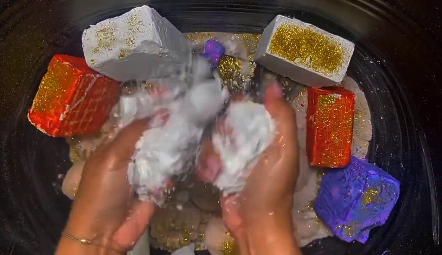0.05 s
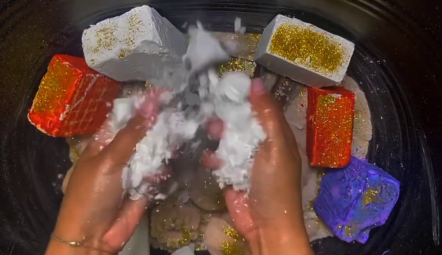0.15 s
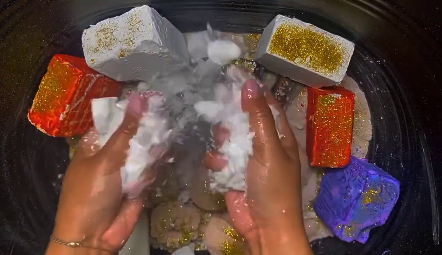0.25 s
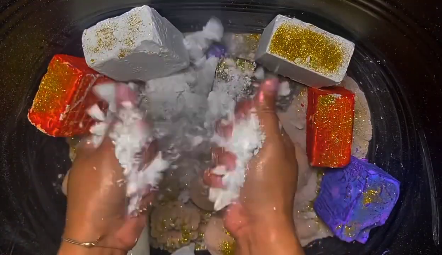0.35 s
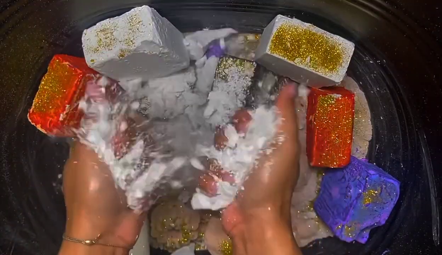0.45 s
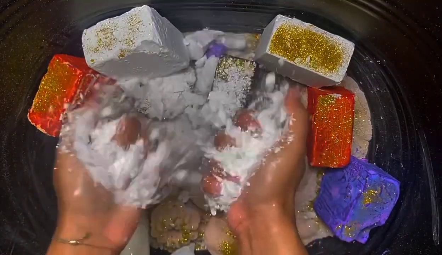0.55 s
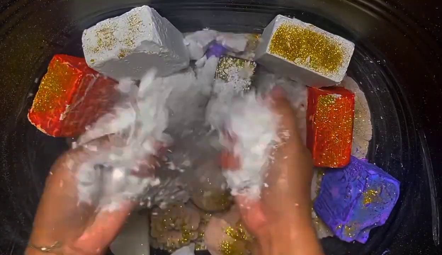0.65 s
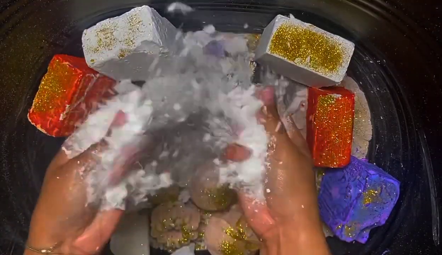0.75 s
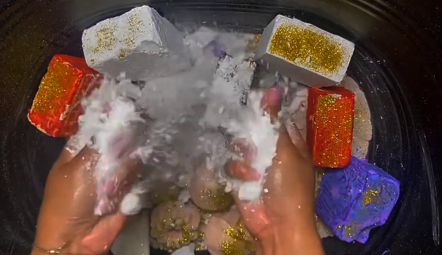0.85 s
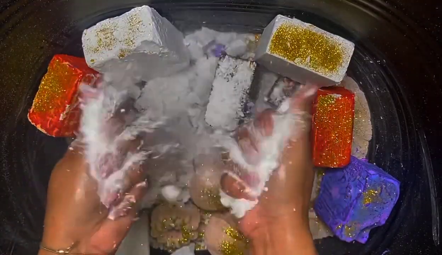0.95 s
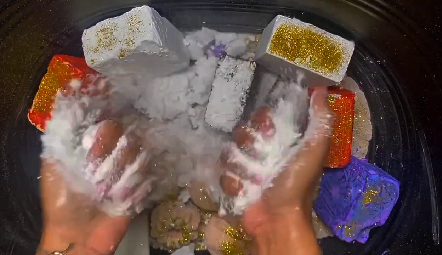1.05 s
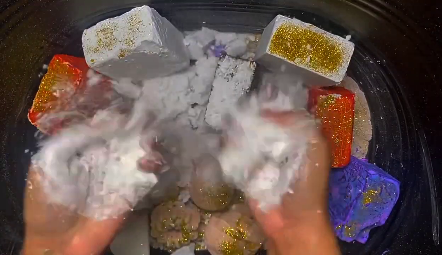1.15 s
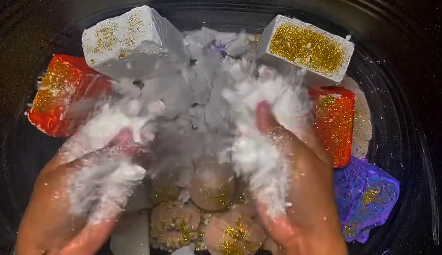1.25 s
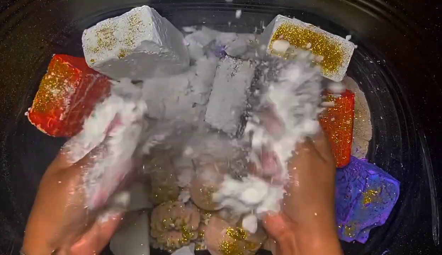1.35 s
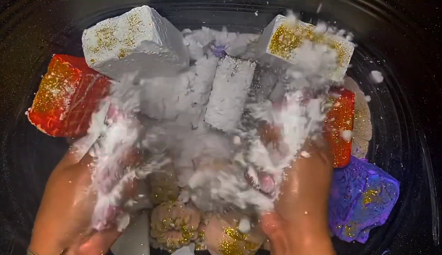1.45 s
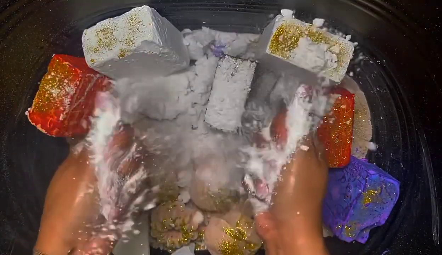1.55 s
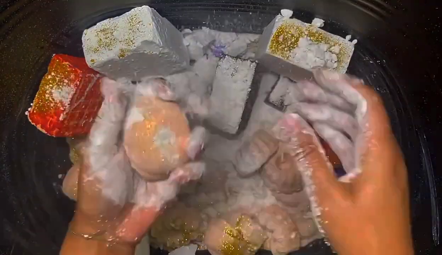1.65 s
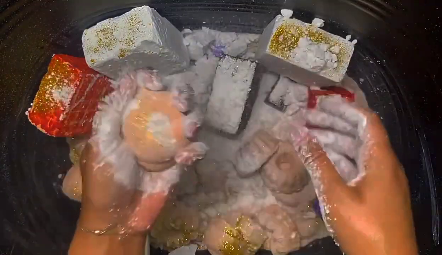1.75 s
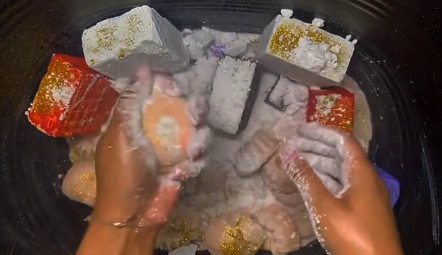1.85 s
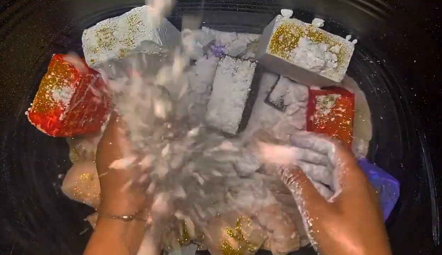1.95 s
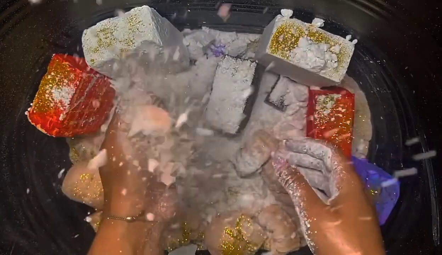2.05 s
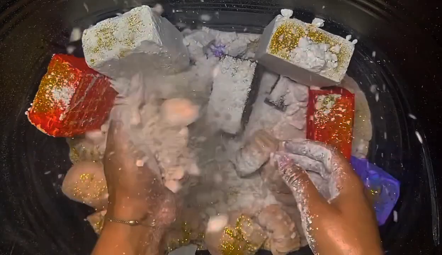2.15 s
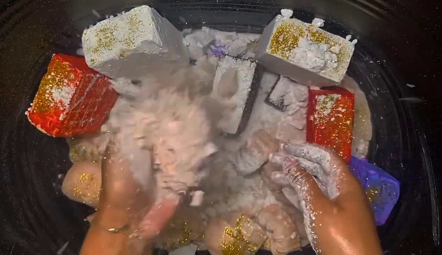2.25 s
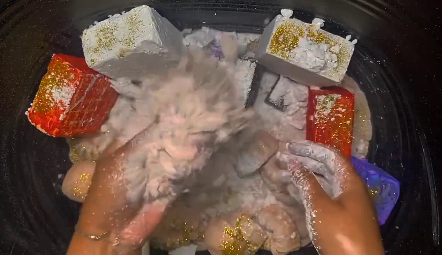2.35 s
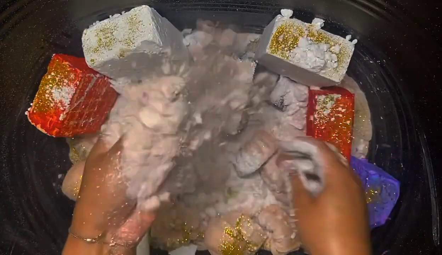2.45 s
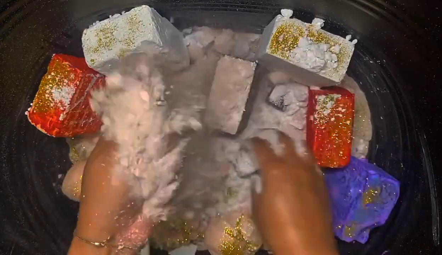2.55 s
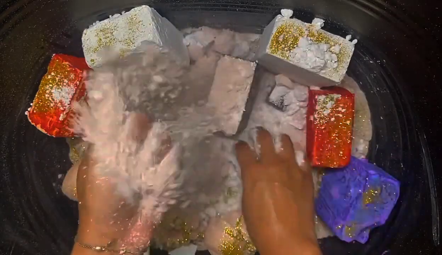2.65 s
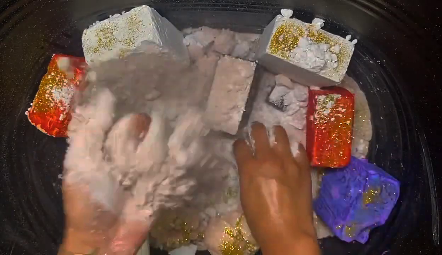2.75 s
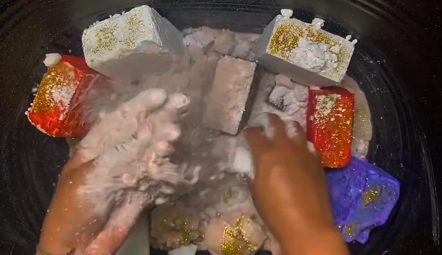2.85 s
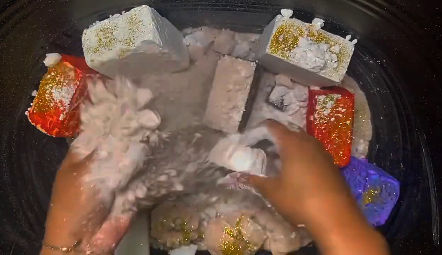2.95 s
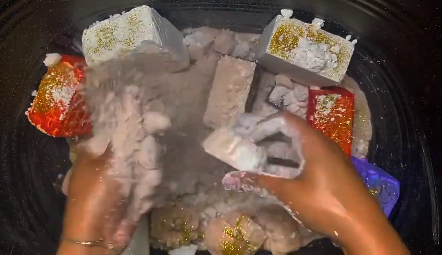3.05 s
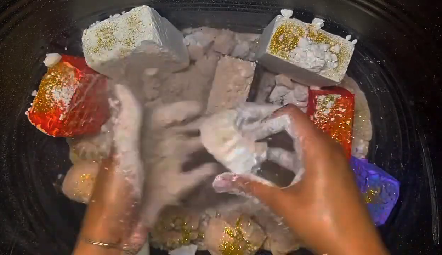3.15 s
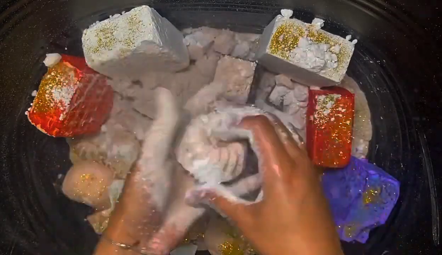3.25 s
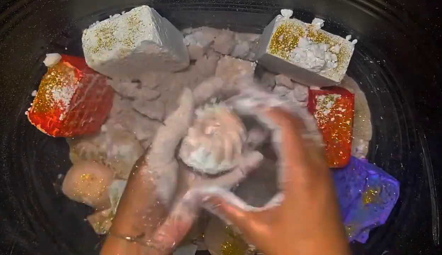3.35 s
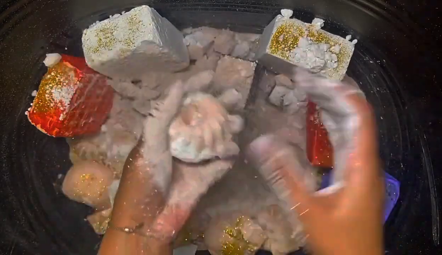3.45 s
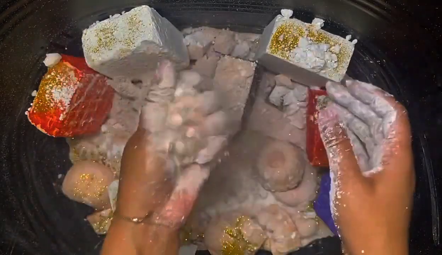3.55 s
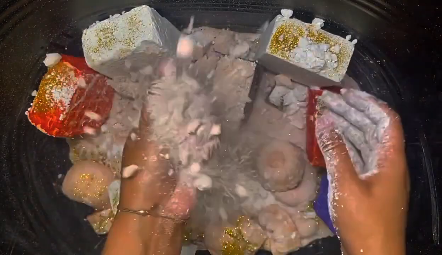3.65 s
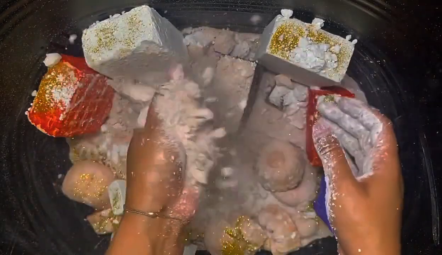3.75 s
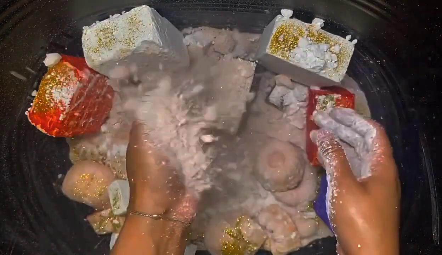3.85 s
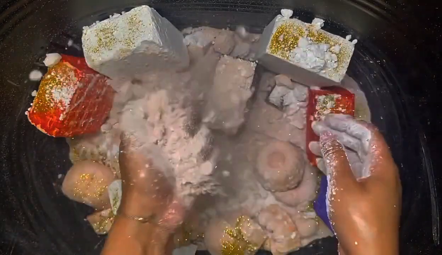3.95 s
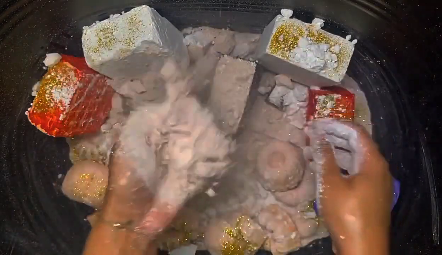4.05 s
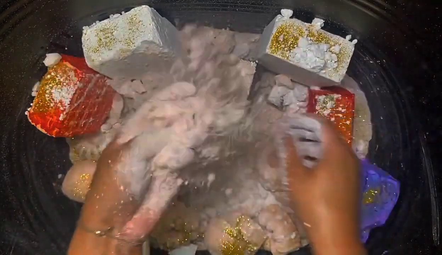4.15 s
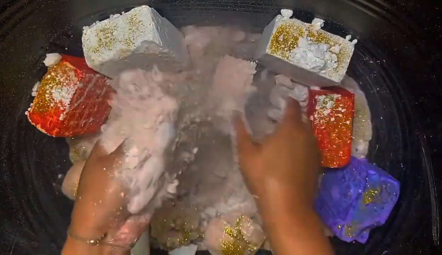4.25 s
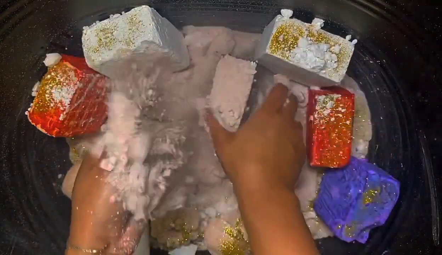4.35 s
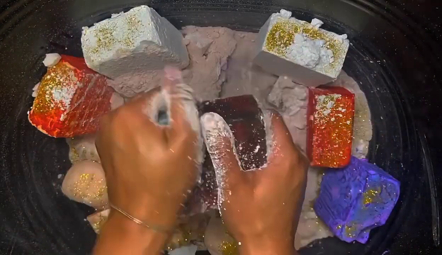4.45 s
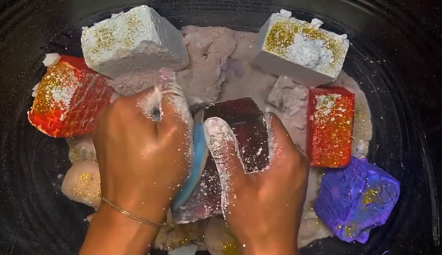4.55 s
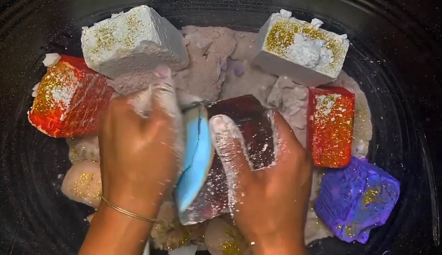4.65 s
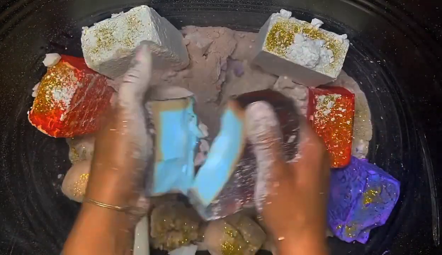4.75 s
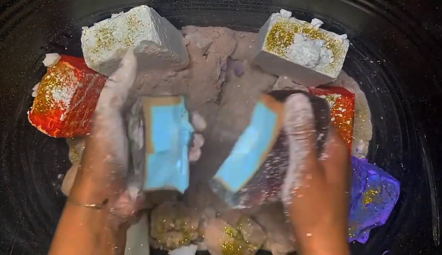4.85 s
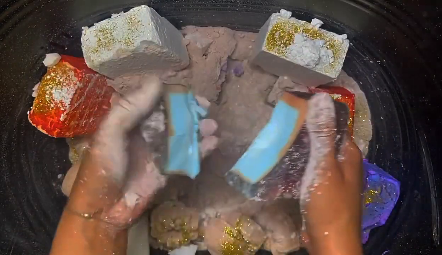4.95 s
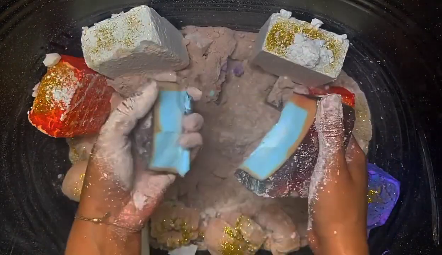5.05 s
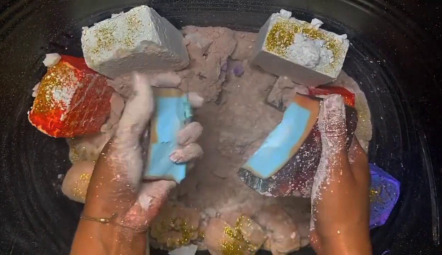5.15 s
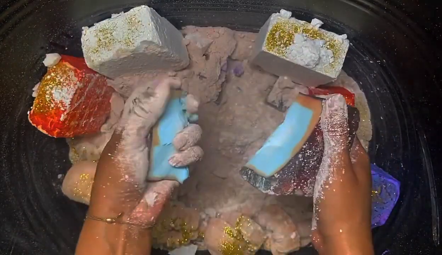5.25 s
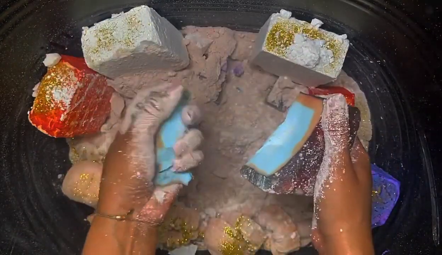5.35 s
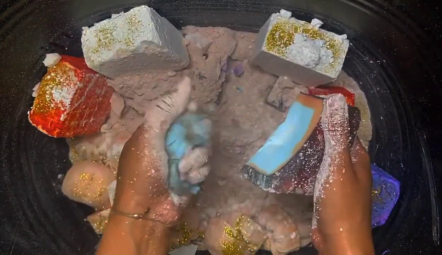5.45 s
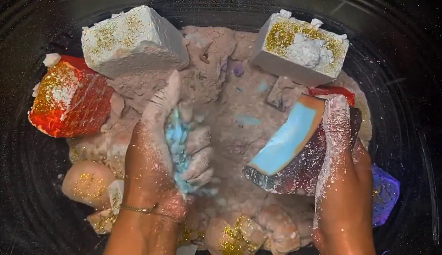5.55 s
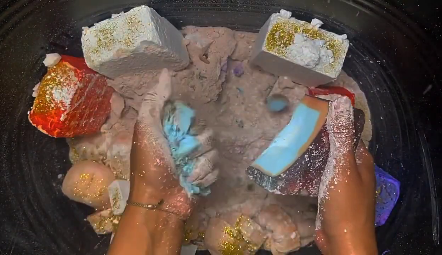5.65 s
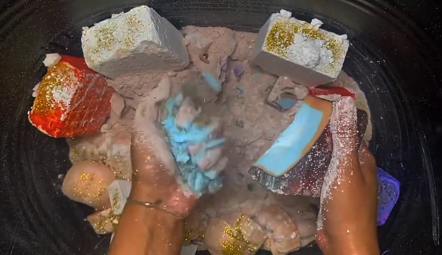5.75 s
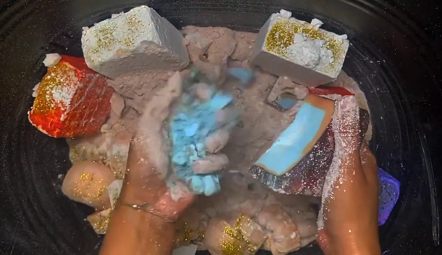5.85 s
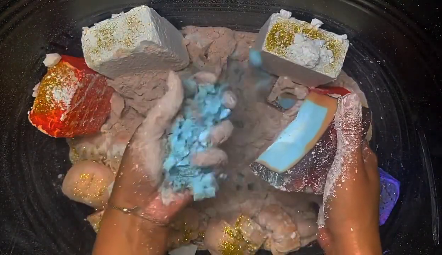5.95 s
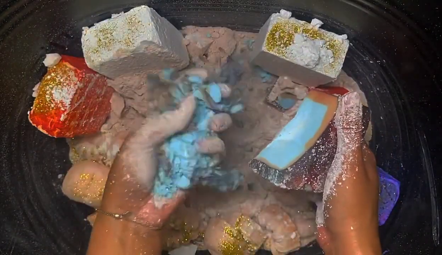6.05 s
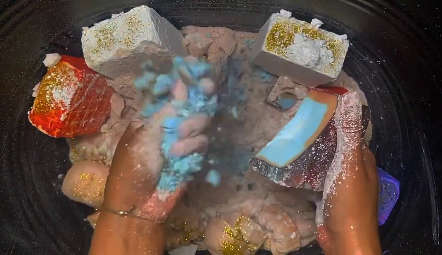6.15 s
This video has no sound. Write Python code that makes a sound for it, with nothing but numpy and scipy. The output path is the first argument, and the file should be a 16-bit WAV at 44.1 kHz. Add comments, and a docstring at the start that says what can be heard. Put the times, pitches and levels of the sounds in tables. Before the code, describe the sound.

Hands crush dry chalk over a plastic tub, close to the microphone in a quiet room. It opens with two loud crunches at about 0.2 and 0.4 seconds: pieces snap with a short, high ring, powder hisses, and lumps thump hollowly on the tub floor. Crumbs patter on, with smaller crunches around 1.3 to 1.5 seconds. A sharp crunch comes at 1.9, then a run of cracks builds to heavy thumps near 2.4. The trickle thins and nearly stops just after 3 seconds. Another crunch at 3.5 spills crackling crumbs until 4, followed by a softer squeeze around 4.3. In the lull near 5 seconds, dry fingers rub very faintly on a hard block. A crisp, lighter crunch follows at about 5.5, and a small crumble comes just after 6 seconds.

```python
"""In a quiet room, hands crush dry chalk blocks over a plastic tub, close under a phone.
Powder hisses and crumbs patter down, swelling with each squeeze and shaking the tub.
Lumps drop and thump the tub floor, which rings low. Pieces snap with a crack and a short, high ring.
Near the end, dry fingers rub faintly on a hard block."""
import sys
import numpy as np
from scipy import signal
from scipy.fft import rfft, irfft
from scipy.io import wavfile

SR = 44100
rng = np.random.default_rng(int(sys.argv[2]) if len(sys.argv) > 2 else 0)


def digitize_waveform(pressure):
    """Quantize a signal to 16-bit integers and store it at the path in sys.argv[1].

    Rows of a 2-D input are taken as channels; values are limited to [-1, 1].
    """
    field = np.atleast_2d(pressure).T
    bounded = np.clip(field, -1, 1)
    quanta = np.round(bounded * 32767).astype(np.int16)
    wavfile.write(sys.argv[1], SR, quanta)


N = 272979


def undb(db):
    return 10 ** (np.asarray(db) / 20)


def level(x, db):
    """Sets the average (RMS) level of x."""
    return x * undb(db) / np.sqrt(np.mean(x ** 2))


def colour(x, table):
    """Turns lows and highs up or down along (pitch_hz, level_db) points."""
    hz, db = np.transpose(table)
    f = np.maximum(np.fft.rfftfreq(len(x), 1 / SR), 1)
    return irfft(rfft(x) * undb(np.interp(np.log(f), np.log(hz), db)), len(x))


def fade(t, fade_s):
    """Dies away by 60 dB in fade_s."""
    return np.exp(-np.log(1000) * t / np.maximum(fade_s, .003))


def add(out, start_s, x):
    """Mixes x into out."""
    i = max(int(start_s * SR), 0)
    out[i:i + len(x)] += x[:N - i]


def crumbs(per_s, scatter_db, smear_s):
    """Random clicks of very uneven size, each smeared into a short noisy tail."""
    chance, size = rng.random((N, 2)).T
    clicks = (chance < per_s / SR) * undb(-scatter_db * np.log(1 - size))
    tail = signal.lfilter([1], [1, -np.exp(-1 / (smear_s * SR))], clicks)
    return tail * rng.standard_normal(N)


# The lows and highs of the room's hush: pitch_hz, relative_db
HUSH_TONE = [(12, -48), (20, 10), (277, -8.5), (377, -4.5), (422, -9), (759, -9.5), (1660, -15),
             (1810, -14.5), (1960, -17.5), (11800, -33), (16000, -71.5)]


def room_hush():
    """The steady hush of the room and the microphone."""
    return level(colour(rng.standard_normal(N), HUSH_TONE), db=-58.5)


# The lows and highs of falling crumbs and powder: pitch_hz, relative_db
PATTER_TONE = [(180, -27.5), (300, 1.5), (565, -22), (689, -12), (1060, -14.5), (2740, -10.5), (4230, -15),
               (6100, -14), (10200, -21.5), (16000, -35)]


def crumb_patter(powder_db=1.0, slip_db=2.42):
    """Crumbs of every size click on the heap over hissing powder."""
    patter = undb(powder_db) * rng.standard_normal(N)
    for hz in 500 * 2 ** np.arange(0, 5, .5):
        # smaller crumbs click higher, more often and more briefly
        clicks = crumbs(per_s=5 * np.sqrt(hz), scatter_db=3, smear_s=0.05 / np.sqrt(hz))
        band = signal.butter(2, [hz, np.sqrt(2) * hz], "band", fs=SR, output="sos")
        patter += signal.sosfilt(band, level(clicks, 0))
    # the heap slides in fits and starts: a new level every 500 samples
    slips = np.repeat(rng.standard_normal(N // 500 + 1), 500)[:N]
    return level(colour(patter * undb(slip_db * slips), PATTER_TONE), 0)


# The notes the tub floor rings at, under crumbs and lumps alike: pitch_hz, relative_db, full_ring_s
TUB_NOTES = [(151, -13.5, 0.24), (188, -19.5, 0.063), (263.2, -3.5, 0.098), (322.5, -7, 0.16),
             (399, -0.5, 0.081), (526.8, 1, 0.087), (620.3, 3, 0.066), (711.6, -1, 0.09), (902, -1.5, 0.05),
             (1300, -4.5, 0.029)]


def tub_rumble(ring_share=0.23, rock_db=-8.5):
    """Heavier crumbs make the tub ring briefly, while the hands rock it on the table."""
    t = np.arange(int(.15 * SR)) / SR
    ring = sum((-1) ** k * undb(db) * np.sin(2 * np.pi * hz * t) * fade(t, ring_share * full_ring_s)
               for k, (hz, db, full_ring_s) in enumerate(TUB_NOTES))
    hits = crumbs(per_s=300, scatter_db=3.2, smear_s=.001)
    rumble = signal.fftconvolve(hits, ring)[:N]
    rocking = signal.lfilter(*signal.butter(2, 90, fs=SR), rng.standard_normal(N))
    return level(rumble, 0) + level(rocking, rock_db)


# Loose powder and crumbs running through the fingers: time_s, level_db
TRICKLE_LEVELS = [(0.0, -39), (0.93, -44.5), (1.06, -48.5), (1.25, -50.5), (1.42, -83), (1.622, -43),
                  (1.68, -62.5), (1.97, -68), (2.04, -48.5), (2.34, -53), (2.49, -42.5), (3.03, -52),
                  (3.131, -61.5), (3.6, -67), (3.74, -43), (3.93, -38), (4.08, -63.5), (4.45, -51.5),
                  (4.53, -64.5), (5.2, -72.5), (5.6, -61.5), (6.08, -69), (6.19, -59)]
# Squeezes that crush a handful, rising and falling by 60 dB: peak_s, level_db, build_s, release_s
HAND_SQUEEZES = [(0.172, -25.5, 0.27, 0.19), (0.42, -25, 0.17, 0.057), (1.108, -48, 0.11, 0.084),
                 (1.312, -39, 0.12, 0.53), (1.461, -36, 0.13, 0.34), (1.868, -29.5, 0.098, .11),
                 (2.13, -40, 0.37, 0.3), (2.248, -30.5, 0.11, 0.2), (2.411, -26, 0.099, 0.16),
                 (3.361, -59, 0.14, 0.1), (3.526, -44, 0.038, 0.15), (3.546, -36.5, 0.055, 0.046),
                 (3.564, -29.5, .05, 0.045), (3.636, -55, 0.016, .3), (4.308, -41, 0.88, 0.17),
                 (5.26, -61, .12, 0.28), (5.46, -41, 0.21, 0.16), (5.829, -61.5, 0.23, 0.18),
                 (5.96, -58.5, 0.2, 0.76), (6.117, -43, 0.089, 0.2)]


def crumbling_chalk(tub_trickle_db=-3, tub_squeeze_db=0.5):
    """Chalk trickles down and pours with each squeeze; the more falls, the more the tub shakes."""
    t = np.arange(N) / SR
    trickle = undb(np.interp(t, *np.transpose(TRICKLE_LEVELS)))
    squeeze = sum(undb(db) * fade(np.abs(t - peak_s), np.where(t < peak_s, build_s, release_s))
                  for peak_s, db, build_s, release_s in HAND_SQUEEZES)
    shake = undb(tub_trickle_db) * trickle + undb(tub_squeeze_db) * squeeze
    return (trickle + squeeze) * crumb_patter() + shake * tub_rumble()


# Lumps landing in the tub: start_s, level_db (peak before the bass cut), pitch_hz, ring_share (0 to 1)
FALLING_LUMPS = [(0.01, -13, 280, 0.63), (0.044, -31, 555, 0.45), (0.065, -6.5, 348, 0.6),
                 (0.075, -13, 395, 0.5), (0.134, -24.5, 320, 1), (0.164, 6, 228, 0.55),
                 (0.174, -7.5, 268, 0.67), (0.25, -34, 317, 0.7), (0.337, -17, 300, 0.76),
                 (0.371, -3.5, 395, 1), (0.403, 3, 660, 0.2), (0.416, -8.5, 440, 1),
                 (0.493, -29, 396, 0.65), (0.539, -31, 400, 0.9), (0.728, -24, 457, 0.66),
                 (0.909, -23, 386, 0.94), (0.988, -23.5, 405, 0.57), (1.292, -19, 352, 0.64),
                 (1.46, -13.5, 420, 0.54), (1.561, -27, 940, 0.56), (1.623, -22, 546, 0.5),
                 (1.804, -27, 267, 0.4), (1.856, -11, 327, 0.5), (2.036, -34.5, 764, 0.7),
                 (2.22, -25, 305, 1), (2.229, -14, 326, 0.6), (2.308, -24, 540, 0.67), (2.368, 2, 290, 0.7),
                 (2.3762, 1, 330, 0.9), (2.399, -19.5, 318, 0.6), (2.632, -28, 246, 0.48),
                 (2.789, -29.5, 400, 0.56), (3.541, -27.5, 242, 0.6), (3.56, -25, 724, 0.55),
                 (3.726, -18.5, 358, 0.48), (3.83, -21, 790, 0.44), (3.87, -22.5, 674, 0.6),
                 (4.246, -19.5, 520, 0.87), (5.247, -33.5, 200, 0.35), (5.46, -26, 182, 0.5),
                 (6.095, -33.5, 277.6, 0.95)]


def lump_thumps(spread_octaves=0.36, bend_s=0.0005, delay_s=.0015, bass_cut_hz=140):
    """Each lump rings the tub notes nearest its pitch; powder under it shortens the ring."""
    out, t = np.zeros(N), np.arange(int(.2 * SR)) / SR
    hz, db, full_ring_s = (c[:, None] for c in np.transpose(TUB_NOTES))
    for start_s, level_db, pitch_hz, ring_share in FALLING_LUMPS:
        nearness = 1 / (1 + (np.log2(hz / pitch_hz) / spread_octaves) ** 2) ** 1.2
        notes = nearness * undb(db) * np.sin(2 * np.pi * hz * t)
        ring = -np.sum(notes * fade(t, ring_share * full_ring_s), axis=0)
        ring *= 1 - np.exp(-t / bend_s)  # the floor bends a moment before it rings
        add(out, start_s + delay_s, undb(level_db) * ring / np.abs(ring).max())
    # a small tub gives off little bass
    return signal.sosfilt(signal.butter(2, bass_cut_hz, "high", fs=SR, output="sos"), out)


# The notes one chalk piece rings at: pitch_ratio (times the piece's pitch), relative_db
CHALK_NOTES = [(.86, -2.5), (1.0, 5.5), (1.13, -3), (1.289, -6), (1.38, -4), (1.61, -21.5), (1.998, -14.5)]
# Pieces that snap or click: start_s, level_db (peak), pitch_hz, ring_db (ring against crack)
SNAPPING_PIECES = [(0.0432, -25, 3480, -8), (0.0698, -17.5, 2940, -2), (0.132, -13, 1950, 3),
                   (0.167, -14, 5870, 21), (0.1658, -14.5, 7440, 10), (0.2038, -16, 4900, -5),
                   (0.2317, -14, 3760, -1), (0.3378, -20.5, 3003, -16), (0.3736, -7.5, 1080, 2),
                   (0.405, -4.5, 3125, 0.5), (0.4163, -6, 2110, -1.5), (0.4463, -15.5, 2060, -1),
                   (0.4953, -25.5, 3270, 3), (0.618, -27.5, 5800, 7), (0.7277, -14, 1950, -4),
                   (0.771, -27, 3280, -4), (0.9078, -20.5, 1550, -2), (0.9909, -21, 1810, 3),
                   (1.1876, -16.5, 2870, 7.5), (1.291, -20.5, 1560, 8), (1.306, -26.5, 2550, 17),
                   (1.4439, -13, 2600, 10), (1.4603, -15, 2680, -2), (1.513, -18.5, 4740, 7),
                   (1.5315, -23.5, 5130, 4), (1.5617, -27.5, 1830, 11), (1.5903, -30, 5800, 2),
                   (1.8026, -28.5, 2120, -2), (1.8549, -7, 1620, 1), (1.86, -10.5, 5340, -17),
                   (2.015, -33.5, 3580, -7), (2.04, -14, 1500, -0.5), (2.0683, -19, 2920, -7),
                   (2.0797, -18.5, 2580, 8), (2.0984, -16.5, 1710, 2), (2.1108, -3, 2740, 5),
                   (2.1397, -20, 1940, -1), (2.1644, -17, 7210, 4), (2.2273, -12, 1247, 1),
                   (2.2735, -21, 1410, 10), (2.306, -19, 2900, -6), (2.3762, -18, 1560, -1),
                   (2.3997, -11, 1610, -2.5), (2.6242, -22.5, 2600, -3), (2.7312, -22.5, 2480, 1),
                   (2.7918, -22, 5760, 2.5), (2.8367, -29.5, 2360, -15), (2.8777, -27.5, 2520, -14),
                   (2.9148, -34, 4080, 20), (3.3447, -31, 2100, -8.5), (3.5417, -24.5, 2390, -8),
                   (3.563, -20, 2260, 4), (3.724, -16.5, 1890, 6.5), (3.809, -21.5, 2260, -1),
                   (3.835, -17.5, 2670, 0), (3.8729, -25, 1540, 20), (3.889, -21.5, 3100, 2),
                   (3.929, -23, 1420, 7), (3.9581, -30, 1590, 12), (4.115, -38, 1660, 18),
                   (4.2472, -18.5, 1197, 7), (4.3151, -26, 2910, 1.5), (5.225, -40.5, 5760, 1.5),
                   (5.2494, -22.5, 6730, -1), (5.3669, -34, 5300, -4.5), (5.416, -32.5, 1625, -4),
                   (5.432, -28, 3030, -20), (5.446, -16.5, 6430, 3), (5.4622, -11.5, 3640, -5),
                   (5.6, -39.5, 6050, -4), (5.6459, -39, 2555, -8), (5.9306, -34, 1270, -1),
                   (6.094, -28, 2655, -4.5)]


def chalk_snaps(base_ring_s=0.027, crack_s=0.02, dust_s=0.089, dust_db=-3):
    """A snapped piece rings briefly under a rough crack; dust trickles after it."""
    out, t = np.zeros(N), np.arange(int(.12 * SR)) / SR
    ratio, db = (c[:, None] for c in np.transpose(CHALK_NOTES))
    phases = 2 * np.pi * rng.random((len(SNAPPING_PIECES), len(CHALK_NOTES), 1))
    noises = rng.standard_normal((len(SNAPPING_PIECES), len(t)))
    rise = 1 - np.exp(-t / 0.00016)
    dull_top = signal.butter(2, 8000, fs=SR)  # fine dust is dull at the very top
    for (start_s, level_db, pitch_hz, ring_db), phase, noise in zip(SNAPPING_PIECES, phases, noises):
        # harder pieces ring both louder and longer; higher notes die sooner
        ring_s = base_ring_s * undb(0.23 * ring_db)
        hz = np.minimum(pitch_hz * ratio, SR / 2.5)
        notes = undb(db) * np.sin(2 * np.pi * hz * t + phase)
        ring = np.sum(notes * fade(t, ring_s / ratio), axis=0)
        hiss = signal.lfilter(*dull_top, noise)
        wide_band = signal.iirpeak(pitch_hz, Q=1 / 3, fs=SR)
        rough = signal.lfilter(*wide_band, signal.lfilter(*wide_band, hiss))
        crack = level(rough, 0) * fade(t, crack_s)
        dust = level(rough + 0.71 * hiss, dust_db) * fade(t, dust_s)
        snap = rise * (undb(ring_db) * ring + crack + dust)
        add(out, start_s, undb(level_db) * snap / np.abs(snap).max())
    return out


def finger_rub(peak_s=5.0, swell_s=0.16, pitch_hz=5900, level_db=-64.5):
    """Dry fingers shift faintly on a hard block."""
    t = np.arange(N) / SR
    clicks = crumbs(per_s=520, scatter_db=1.9, smear_s=0.0032)
    grit = signal.lfilter(*signal.iirpeak(pitch_hz, Q=3, fs=SR), clicks)
    return level(grit, level_db) * np.exp(-((t - peak_s) / swell_s) ** 2)


def scene():
    """All the sounds together in one channel."""
    return (crumbling_chalk() + lump_thumps() + chalk_snaps() + finger_rub() + room_hush())[None]


def record(dry):
    """The phone rounds off the loudest peaks and cuts the very highest sounds."""
    rounded = dry / (1 + dry ** 4) ** .25
    top_hz = 15900
    return signal.sosfilt(signal.ellip(10, .2, 70, top_hz, fs=SR, output="sos"), rounded)


dry = scene()
out = record(dry)
digitize_waveform(out)
```